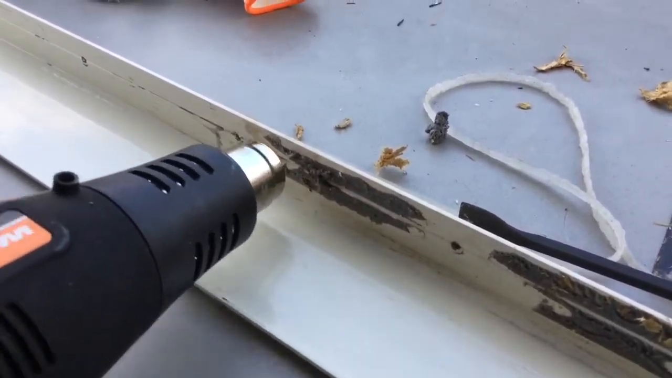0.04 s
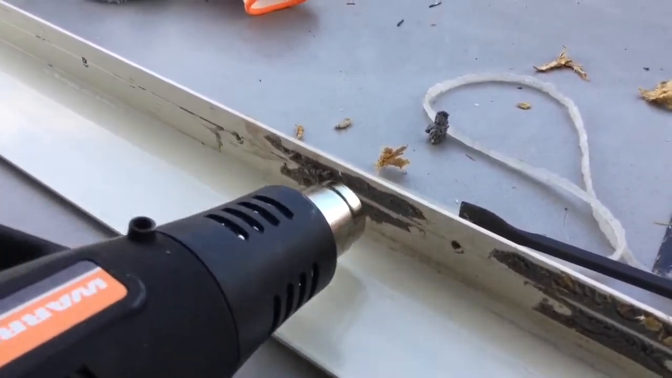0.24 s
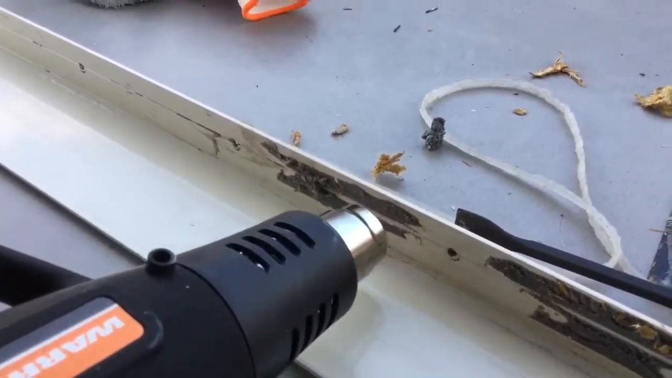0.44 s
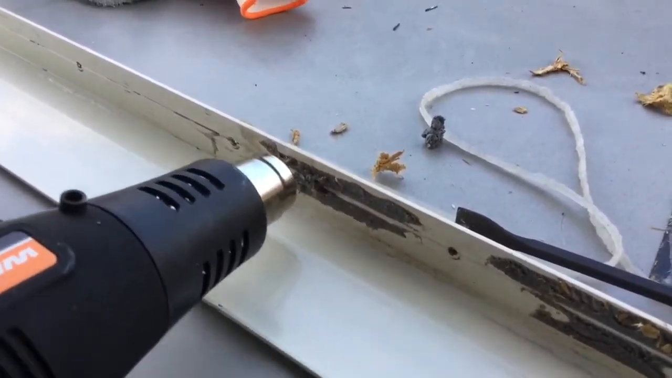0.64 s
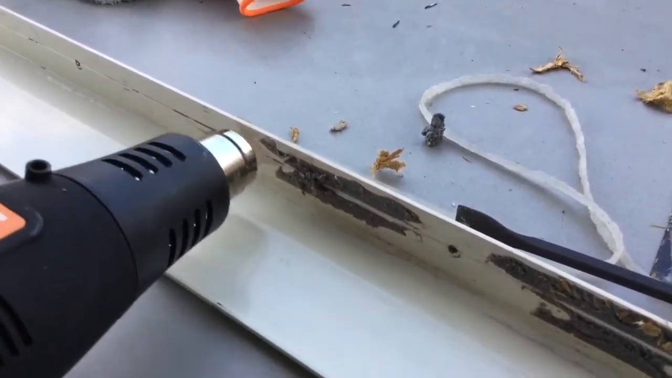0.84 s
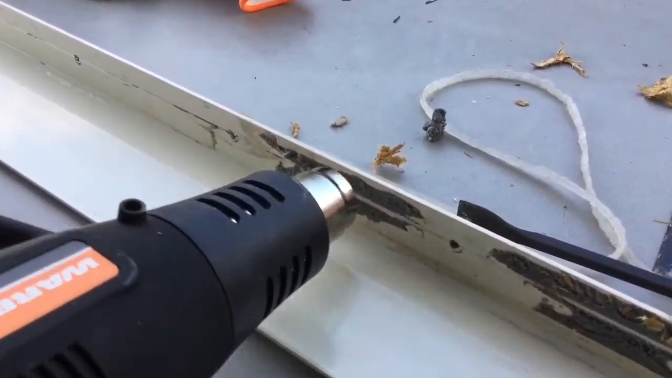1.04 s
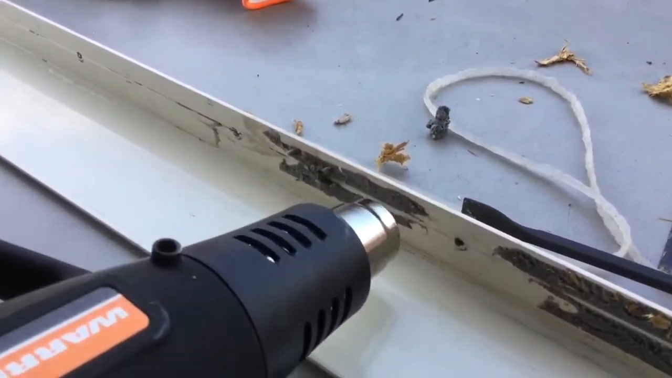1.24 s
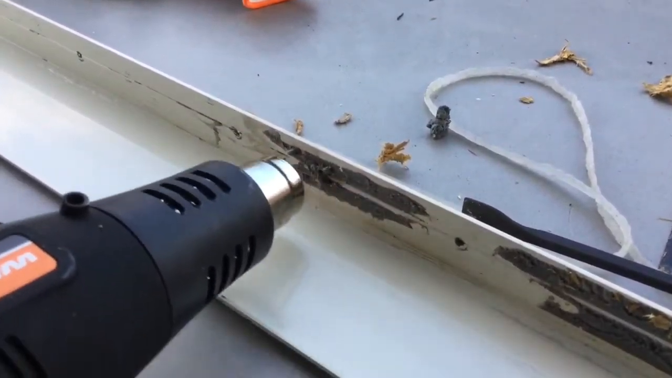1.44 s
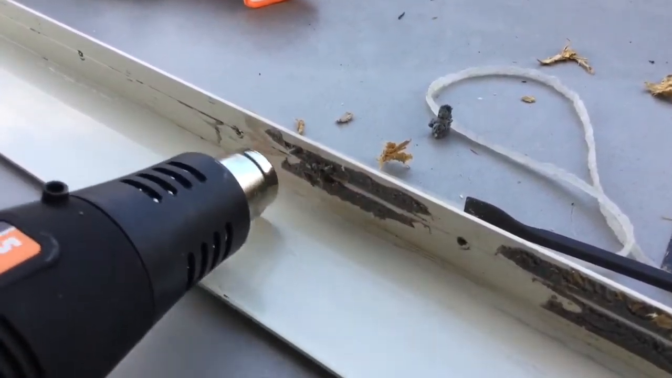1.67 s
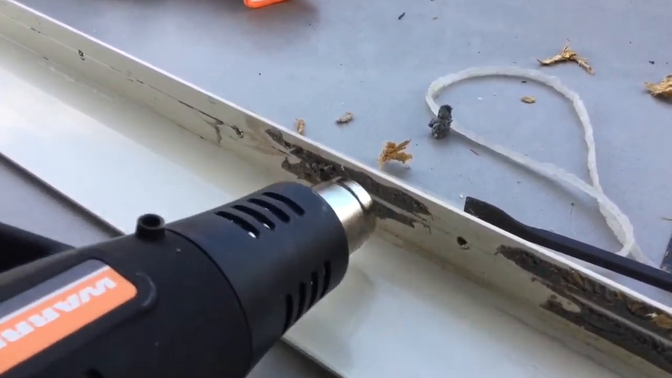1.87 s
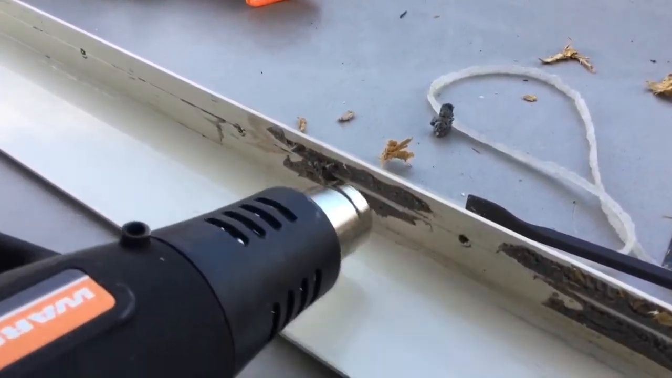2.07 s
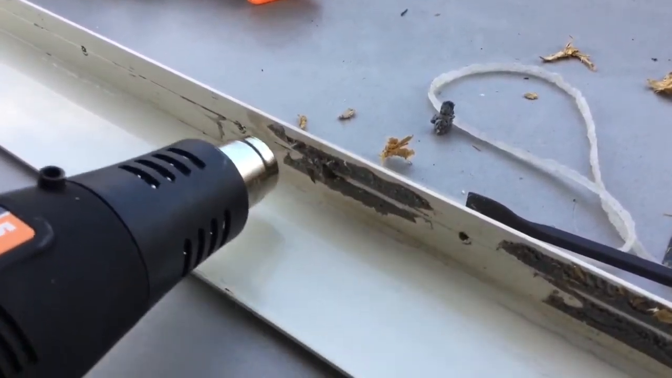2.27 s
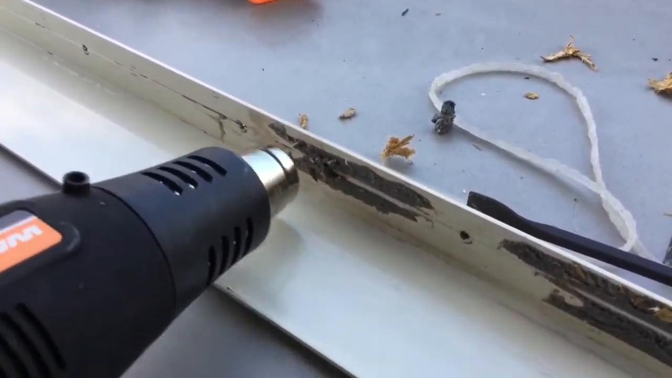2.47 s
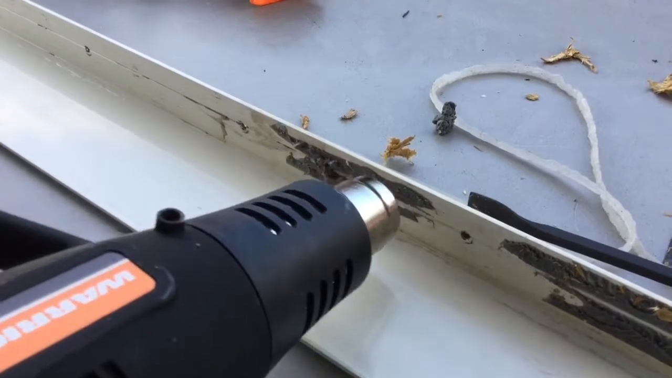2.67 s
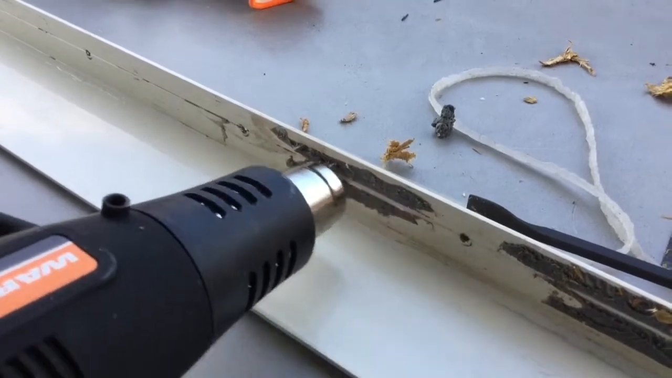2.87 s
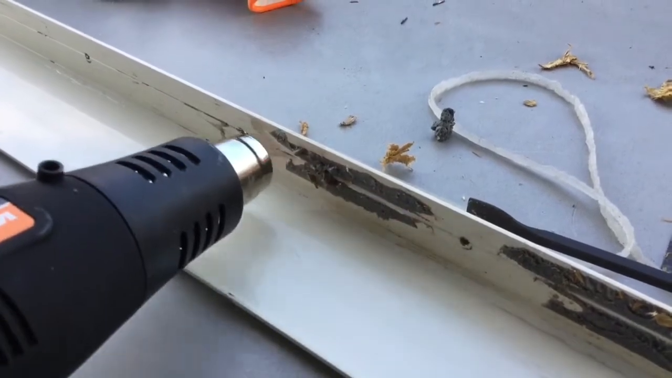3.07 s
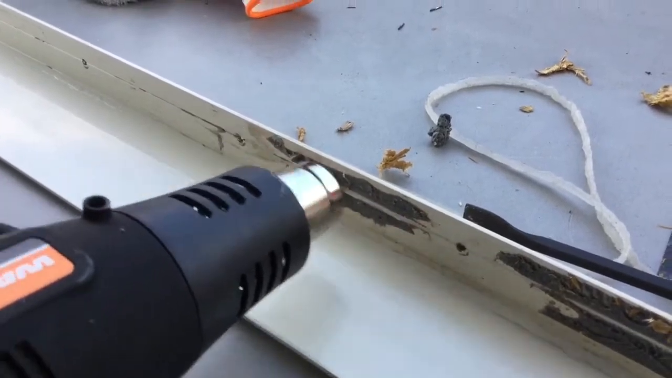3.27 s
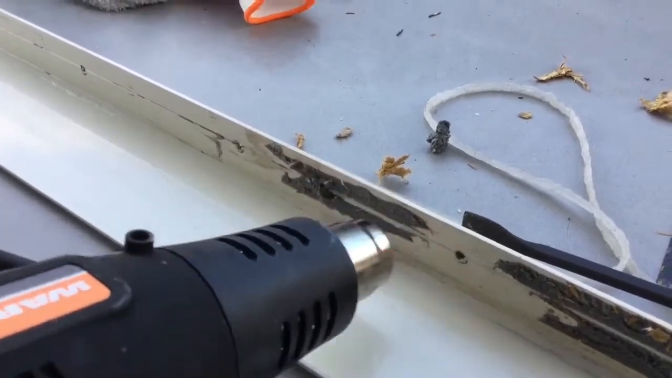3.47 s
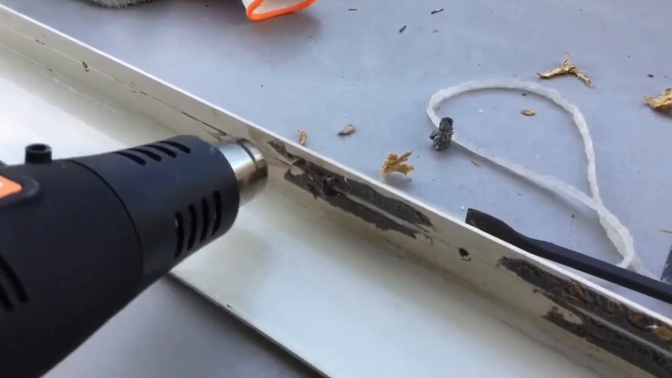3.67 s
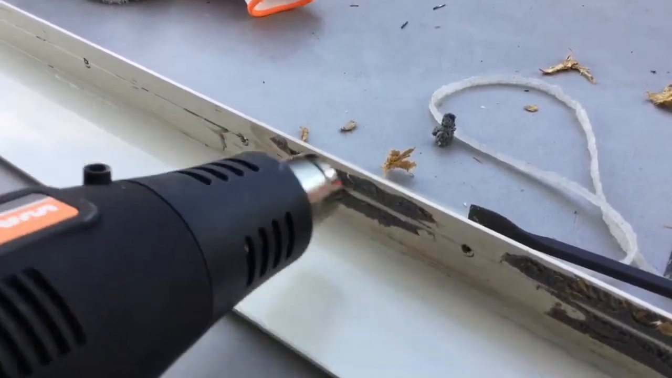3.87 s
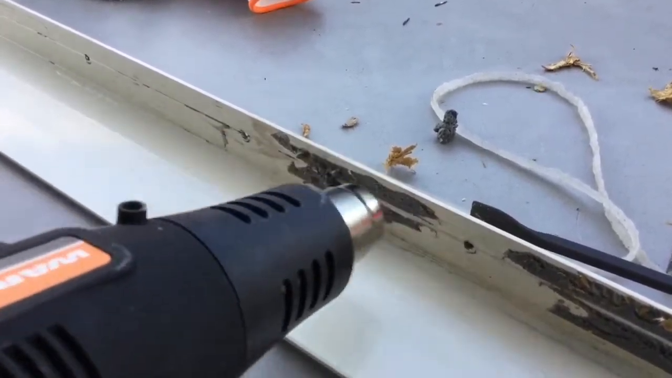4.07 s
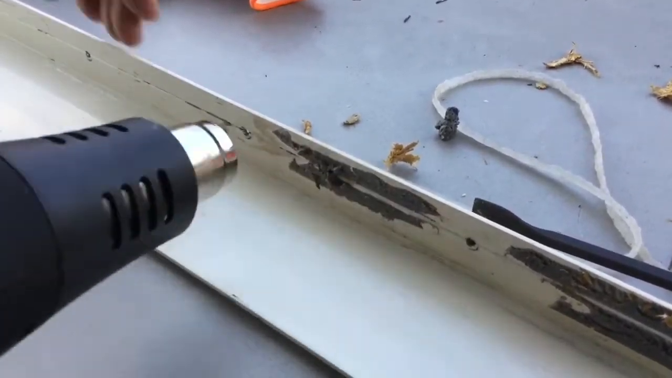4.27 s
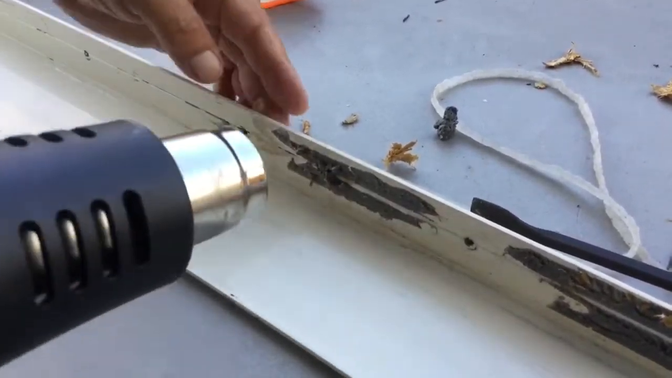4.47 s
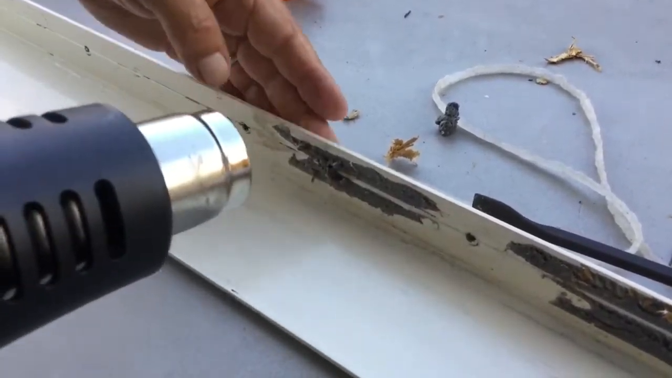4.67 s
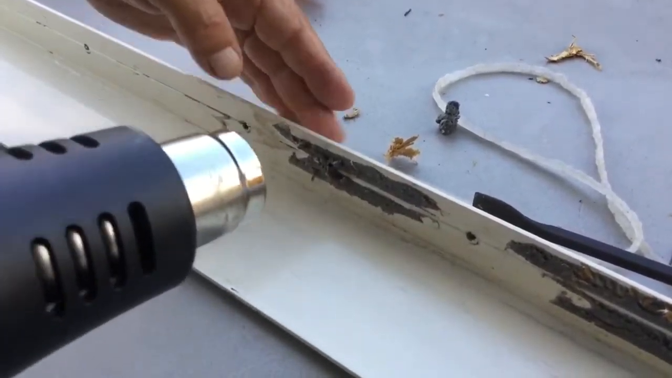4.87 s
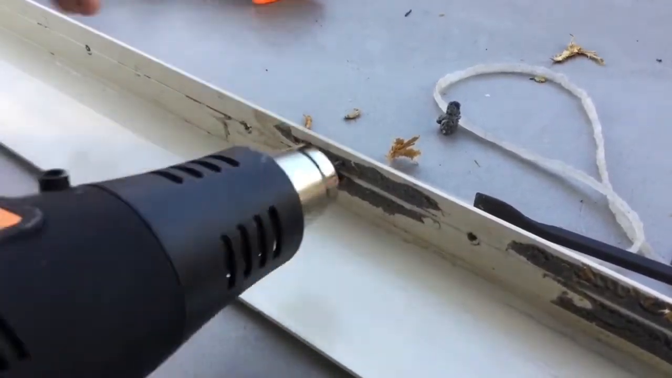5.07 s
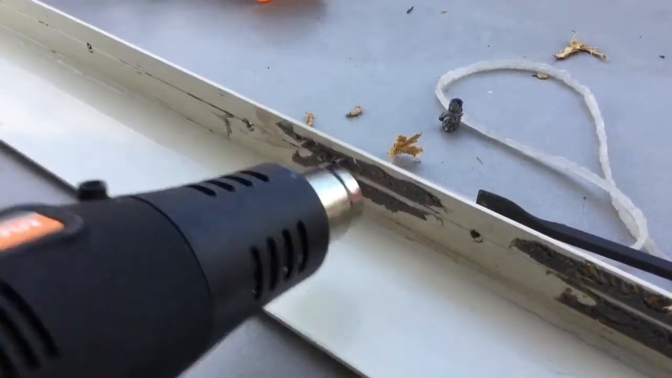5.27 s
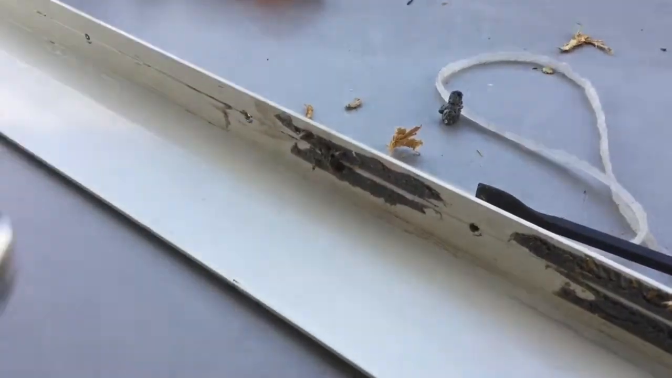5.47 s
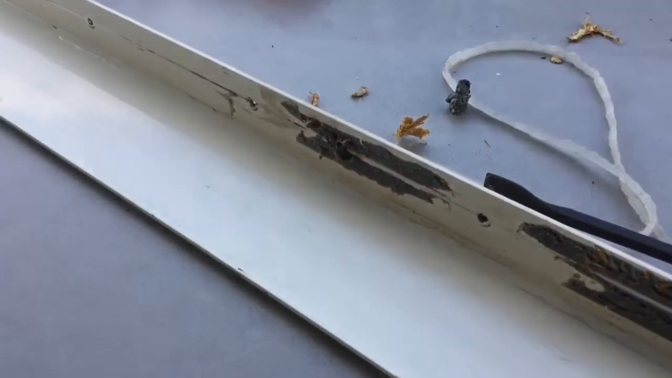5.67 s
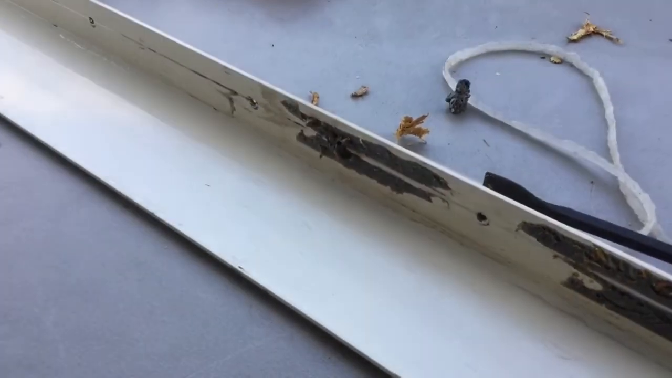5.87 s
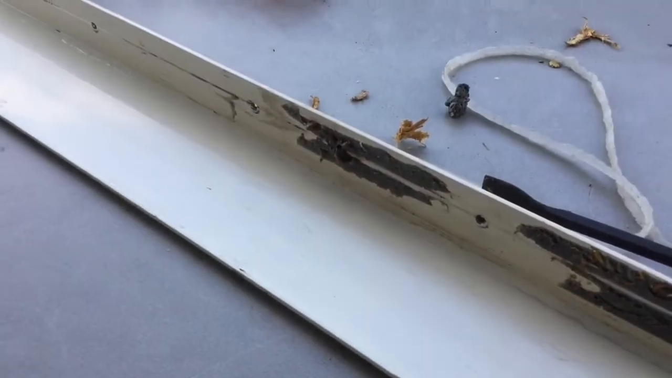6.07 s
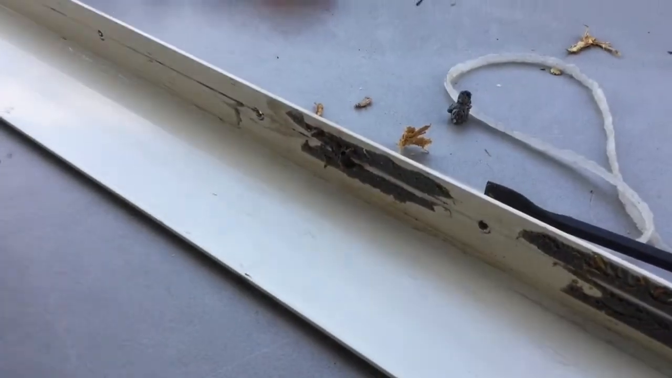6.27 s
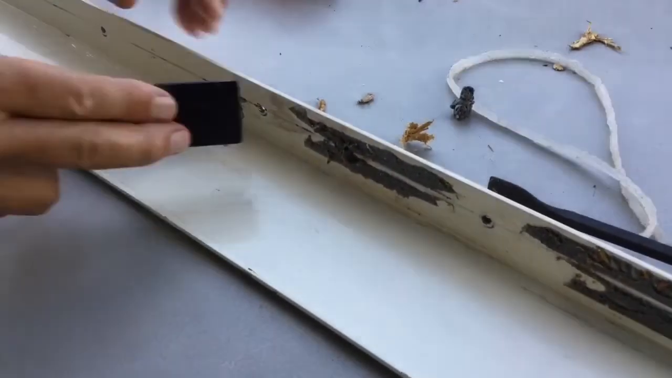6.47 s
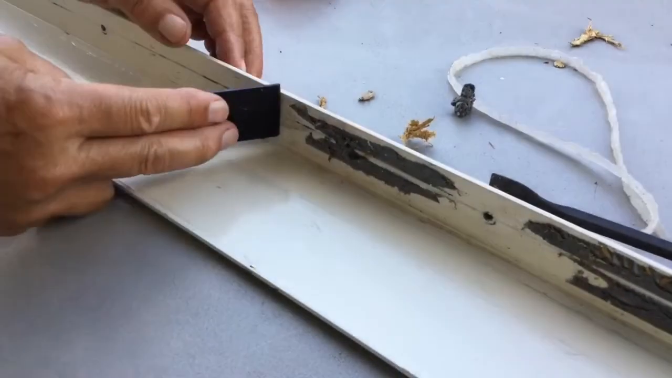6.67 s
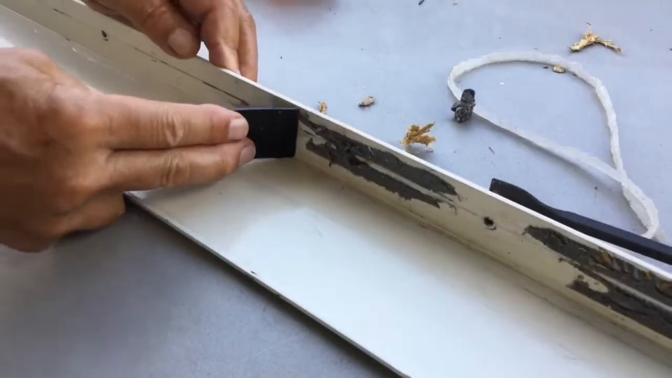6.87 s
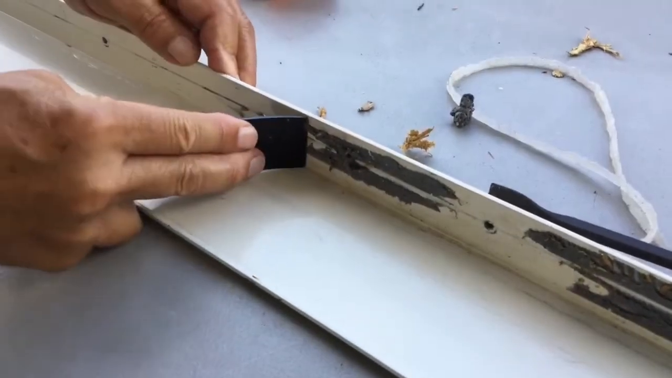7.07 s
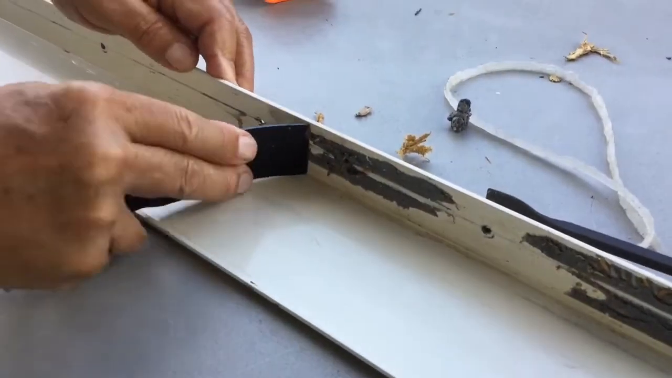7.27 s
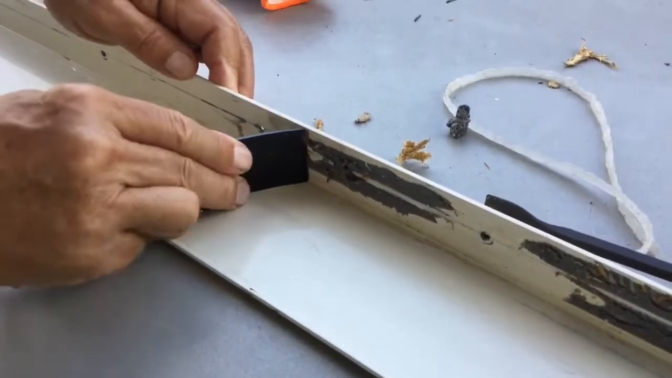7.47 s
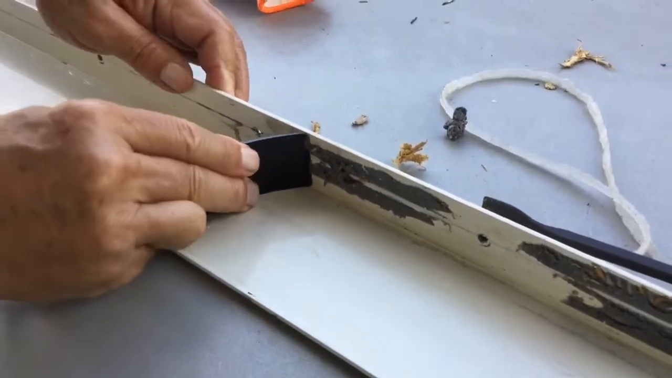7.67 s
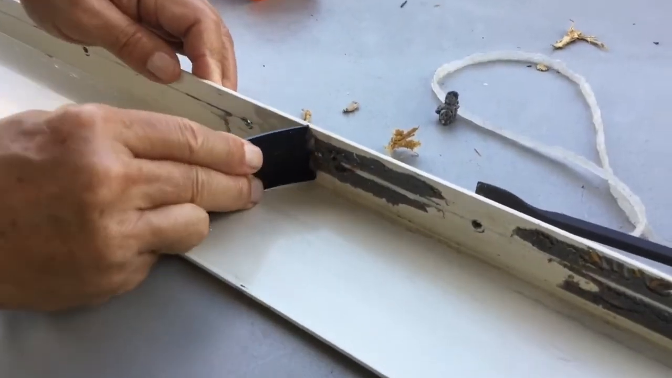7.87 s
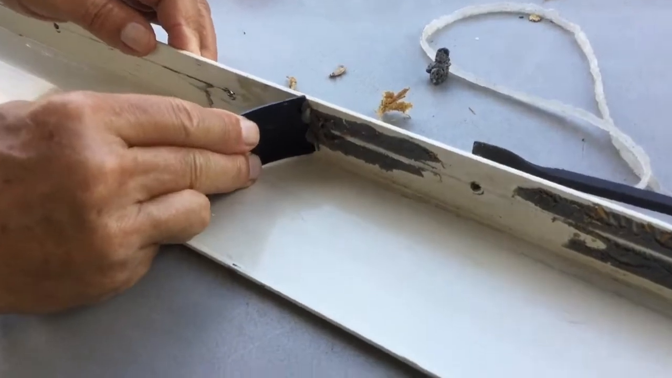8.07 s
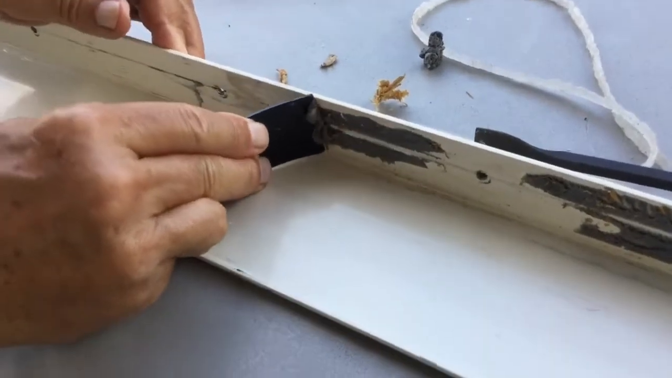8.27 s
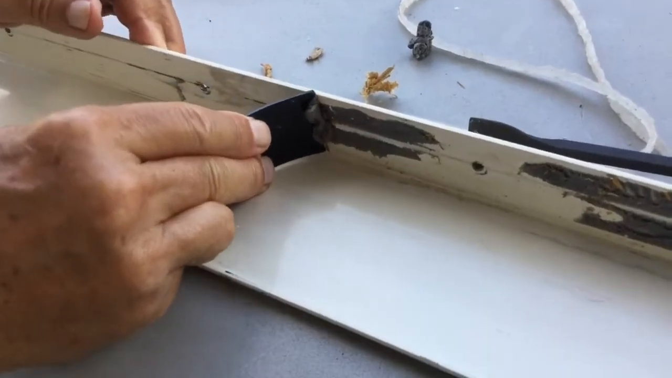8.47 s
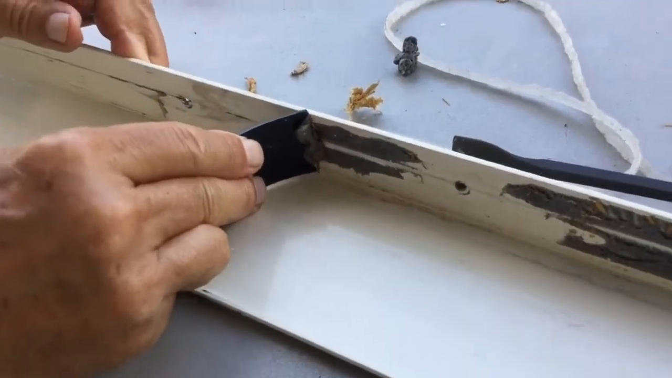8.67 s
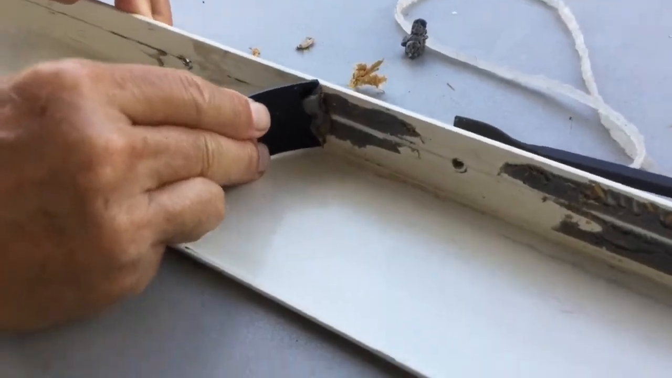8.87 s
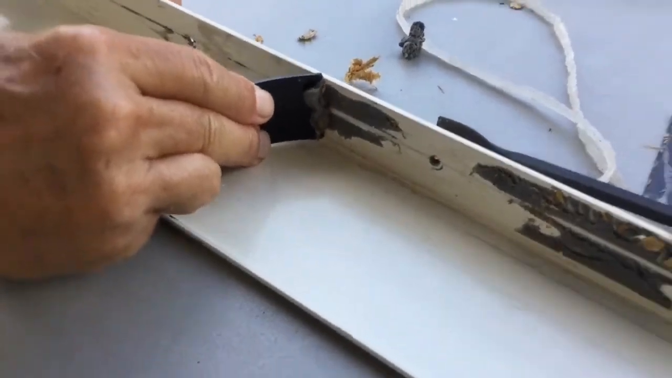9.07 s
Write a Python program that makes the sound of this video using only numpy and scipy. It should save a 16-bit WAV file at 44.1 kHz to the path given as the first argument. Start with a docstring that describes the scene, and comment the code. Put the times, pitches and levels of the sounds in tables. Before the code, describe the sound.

A heat gun blows and whines steadily up close, switches off and spins down, is set down with clattering knocks, then quiet rubbing and faint birds outdoors.

```python
"""An electric heat gun is waved over a painted metal frame on an outdoor table, close to a phone.
Air rushes from the nozzle as coloured noise; sines locked to the turning shaft make the fan's blade tone
and the motor's whine. It is switched off, coasts and is set down with knocks that ring table and frame.
Hands then settle on the frame and rub it with a small pad, as short bursts of noise.
Under it all lie a low outdoor hum and hiss, and later a few distant birds made of falling chirps."""
import sys
import numpy as np
from scipy import signal
from scipy.fft import rfft, irfft
from scipy.io import wavfile

SR = 44100
rng = np.random.default_rng(int(sys.argv[2]) if len(sys.argv) > 2 else 0)


def waveform_to_disk(signal):
    """Save audio, clipped to [-1, 1], as 16-bit WAV at the path in sys.argv[1]."""
    frames = np.transpose(np.atleast_2d(signal))
    scaled = np.clip(frames, -1, 1) * 32767
    samples = np.round(scaled).astype(np.int16)
    wavfile.write(sys.argv[1], SR, samples)


N = 403074
T = np.arange(N) / SR
FREQ = np.maximum(np.fft.rfftfreq(N, 1 / SR), 1)  # Hz, kept off zero for logarithms
OFF_S, COAST_S = 5.296, 0.32  # the switch opens; drag has halved the rotor's speed this much later
SWEEP_S, SWEEP_LOW_S = 0.777, 0.39  # period of the hand's sweep; time of a low point
LOUDEST_MULTIPLE = 51  # cycles of the loudest whine per turn of the shaft
SOUND_SPEED = 343  # m/s


def undb(db):
    """Decibels to gain."""
    return 10 ** (np.asarray(db) / 20)


def unit(x):
    """Scale to rms 1."""
    return x / np.sqrt(np.mean(x ** 2))


def curves(rows):
    """Each column of a timed table, sample by sample."""
    s, *columns = np.transpose(rows)
    return [np.interp(T, s, c) for c in columns]


def walk(rate):
    """Smooth random curve of spread near 1, drawn through `rate` random values a second."""
    count = int(N / SR * rate) + 3
    fine = signal.resample(rng.standard_normal(count), 8 * count)
    return np.interp(T * rate * 8, np.arange(len(fine)), fine)


def colour(points, rings=()):
    """Gain at each frequency: a broad spectrum with resonant humps."""
    hz, db = np.transpose(points)
    db = np.interp(np.log(FREQ), np.log(hz), db)
    for centre, width, lift in rings:
        db = db + lift / (1 + (2 * (FREQ - centre) / width) ** 2)
    return undb(db)


def noise(gain):
    """Noise of rms 1, coloured by the given gain at each frequency."""
    return unit(irfft(rfft(rng.standard_normal(N)) * gain, N))


def swell(s, rise, fade):
    """Contact force that builds up to time s and dies away."""
    return np.exp(np.where(T < s, (T - s) / rise, (s - T) / fade))


def posed(levels_db, sweep, turn, beam=2.5):
    """Gain of one part of the gun as it sweeps, comes nearer and faces away from the microphone."""
    aimed, swept, nearer, away = levels_db
    return undb(aimed + swept * sweep + nearer * turn + away * turn ** beam)


def facing(turn, aim, width=0.2):
    """Share of a beam that reaches the microphone as the gun turns through its aim."""
    return np.exp(-((turn - aim) / width) ** 2)


def rung(push, modes):
    """A pushed body rings with its decaying modes; the whole ring has unit energy."""
    t = T[:SR // 3]
    ring = np.zeros(len(t))
    for hz, t60, db in modes:
        decay = np.exp(-np.log(1000) * t / t60)
        ring += undb(db) * np.cos(2 * np.pi * hz * t) * decay
    return signal.fftconvolve(push, ring / np.linalg.norm(ring))[:N]


# Air in the barrel. Each row: frequency in Hz, relative level in dB per Hz.
AIR_SPECTRUM = [(25, -45.5), (60, -37), (120, -27.5), (160, -15.5), (260, -19.5), (380, -17), (520, -14),
                (760, -4), (1300, -10), (2300, -15), (3100, -14.5), (3400, -17.5), (3800, -13), (4400, -14),
                (5100, -24.5), (8800, -23), (10400, -27.5), (13300, -23), (15700, -28)]
# Cavities of the barrel. Each row: frequency in Hz, width in Hz, lift in dB.
BARREL_CAVITIES = [(1019, 250, 8.5), (1722, 550, 6.5), (2890, 100, 4), (3700, 130, 3.5), (6050, 140, 6.5)]
# Hiss of the half-turned gun, partly shaded by its nozzle. Each row: frequency in Hz, width in Hz, lift in dB.
NOZZLE_SHADE = [(3400, 540, 1.5), (4250, 653, -4.5), (5530, 380, 6.5)]
# Low roar and high hiss at full speed. One row each: level aimed at the frame in dB, change at the low
# point of a sweep in dB, change when lifted nearer in dB, change when facing away in dB.
ROAR_LEVELS = (-32.5, 1, -1.0, 0.1)
HISS_LEVELS = (-37, -0.24, 5.5, -6)


def airflow(angle, speed, sweep, turn, split_hz=1900, roar_power=2.95, hiss_power=3.5, chop=0.17,
            gust_db=3.5, echo=0.17, dull_hz=6000, near_ms=0.059, lifted_ms=0.49, lift_power=2.1,
            vent_db=-42, flutter_db=2):
    """Turbulence rings the barrel, the rotor chops its hiss, and the echo off the frame combs it."""
    low_share = 1 / (1 + (FREQ / split_hz) ** 6)
    low, high = np.sqrt(low_share), np.sqrt(1 - low_share)
    barrel = colour(AIR_SPECTRUM, BARREL_CAVITIES)
    roar = noise(barrel * low) * undb(0.32 * walk(160) + 0.42 * walk(10))
    shaded = facing(turn, 0.35, width=0.13)
    shaded_barrel = colour(AIR_SPECTRUM, BARREL_CAVITIES + NOZZLE_SHADE)
    hiss = np.sqrt(1 - shaded) * noise(barrel * high) + np.sqrt(shaded) * noise(shaded_barrel * high)
    hiss = hiss * undb(0.484 * walk(200) + 0.84 * walk(12))
    # both die with a power of the rotor's speed
    roar = roar * posed(ROAR_LEVELS, sweep, turn) * speed ** roar_power
    hiss = hiss * posed(HISS_LEVELS, sweep, turn) * speed ** hiss_power
    # the flow breaks into gusts as the rotor slows
    gusts = undb(gust_db * (1 - speed) * walk(70))
    air = (roar + hiss * (1 + chop * np.cos(2 * angle))) * gusts
    # the narrow frame scatters the highest hiss instead of mirroring it
    mirrored = irfft(rfft(air) / (1 + (FREQ / dull_hz) ** 6), N)
    lag_ms = near_ms + (lifted_ms - near_ms) * turn ** lift_power
    reflected = np.interp(T - lag_ms / 1000, T, mirrored)
    # turned aside, the vent slots face the microphone
    slots = colour([(60, -18.5), (400, -28.0), (3000, -27.5), (7000, -25.0), (15000, -33)],
                   [(1930, 830, 23), (5580, 1400, 16.0)])
    vents = turn ** 3 * noise(slots) * undb(vent_db + flutter_db * walk(30)) * speed ** roar_power
    return (air + echo * reflected + vents) * np.interp(T, [5.62, 5.72], [1, 0])


# Blade tone at full speed. One row: peak level aimed at the frame in dB, change at the low point of a
# sweep in dB, change when lifted nearer in dB, change when facing away in dB.
BLADE_LEVELS = (-36.5, 0.9, 6.5, -18.5)


def fan(angle, speed, sweep, turn, flutter_db=0.5, waver_db=1.1):
    """Six blades pass the stator vanes in uneven inflow."""
    tone = np.sin(6 * angle + .15 * walk(60))  # phase jitter in radians
    unsteady = undb(flutter_db * walk(40) + waver_db * walk(11.0))
    return tone * posed(BLADE_LEVELS, sweep, turn) * unsteady * speed ** 8


# Motor whine. Each row: multiple of the shaft rate, peak level aimed at the frame in dB, peak level
# turned aside in dB, all before whine_db and the table echo.
WHINE_LINES = [(1, -58, -68), (2, -51, -56), (3, -53, -50), (5, -60, -52), (7, -50, -52), (8, -52, -54),
               (9, -57, -52), (10, -55, -44), (11, -61, -55), (12, -49, -52), (15, -57, -62),
               (30, -59, -48), (33, -59, -58), (34, -60, -51), (35, -59, -61), (36, -60, -56),
               (40, -55, -62), (41, -58, -54), (44, -53, -57), (45, -48, -53), (49, -55, -47),
               (50, -60, -46), (52, -53, -53), (53, -62, -52), (54, -54, -59), (55, -61, -53),
               (56, -47, -57), (57, -57, -61), (59, -61, -56)]
# Loudest line of the whine. Each row: time in seconds, rms level in dB.
LOUDEST_LEVEL = [(0, -47), (.14, -38.5), (.4, -52), (.55, -42), (.8, -52), (.95, -40), (1.12, -52),
                 (1.34, -42), (1.55, -54.5), (1.8, -38), (2, -61), (2.13, -37.5), (2.33, -61),
                 (2.48, -38.5), (2.7, -58.5), (2.9, -41), (3.05, -41), (3.25, -42), (3.4, -45), (3.58, -37),
                 (3.7, -61), (3.85, -47), (4.1, -44.5), (4.3, -59), (4.5, -41.5), (5.1, -56), (5.22, -45)]
# Tones beamed through the vent slots. Each row: multiple of the shaft rate, mean peak level in dB when
# pointed at the microphone, turn that points it there from 0 to 1.
VENT_BEAMS = [(8, -49, .47), (9, -53, .36), (10, -50.5, .5), (20, -53, .5), (21, -51, .38), (28, -59, .3),
              (29, -56, .35), (40, -58, .42), (41, -57, .5)]


def motor(angle, shaft_hz, sweep, turn, detour_m=0.178, swing_m=0.012, tremor_m=0.007, drift_m=0.0072,
          table_echo=0.6, lifted_loss=0.42, weak_db=-64, whine_db=2.5, waver_db=3, cut_s=0.004):
    """Commutator whine on the shaft's multiples; a table echo fades most lines, the loudest swells on its own."""
    # extra path of the echo off the table
    path_m = detour_m + swing_m * sweep + drift_m * turn * walk(2.2) + tremor_m * walk(13)
    echo_angle = (2 * np.pi * shaft_hz * path_m / SOUND_SPEED).astype(np.float32)
    beamed = np.zeros(N)
    for k, db, aim in VENT_BEAMS:
        beamed += np.sin(round(k) * angle) * undb(db + waver_db * walk(8)) * facing(turn, aim)
    s, level_db = np.transpose(LOUDEST_LEVEL)
    loudest = np.sqrt(2) * np.sin(LOUDEST_MULTIPLE * angle) * np.interp(T, s, undb(level_db))

    lines = {round(k): (ahead, aside) for k, ahead, aside in WHINE_LINES}
    angle = (angle % (2 * np.pi)).astype(np.float32)
    turn, whine = turn.astype(np.float32), np.zeros(N)
    # lifted off the table, these echoed lines hold steadier
    echo = table_echo * (1 - lifted_loss * turn ** 2)
    for k, start in enumerate(rng.uniform(0, 2 * np.pi, size=60).tolist(), 1):
        ahead, aside = lines.get(k, (weak_db, weak_db))
        phase = k * angle + start
        # of these, the high lines are beamed at the table and fade the most
        reflected = echo * (k / LOUDEST_MULTIPLE) ** .5 * np.sin(phase - k * echo_angle)
        whine += undb(ahead + (aside - ahead) * turn) * (np.sin(phase) + reflected)
    # the whine stops with the current
    current = np.exp(-np.maximum(T - OFF_S, 0) / cut_s)
    return (whine * undb(whine_db) + beamed + loudest) * current


# Rings of the motor can and brush springs. Each row: frequency in Hz, width in Hz, lift in dB.
CAN_RINGS = [(4700, 700, 5.5), (5700, 270, 3), (7940, 700, 8.5), (11640, 600, 12), (13300, 650, 15.5),
             (14050, 300, 7), (15000, 800, 8)]


def brushes(angle, running_db=-57, coasting_db=-41, chop=0.39):
    """Brushes scrape the commutator and ring the can, most as it coasts, until the gun is taken away."""
    scrape = noise(colour([(3000, -16.5), (10000, -21.0), (13000, -15.0), (16000, -21.0)], CAN_RINGS))
    level_db = np.interp(T, [OFF_S - .02, OFF_S + 0.032], [running_db, coasting_db])
    away_db = np.interp(T, [5.43, 5.49, 5.62, 6.0], [-1.0, -10, -34, -68])
    return scrape * (1 + chop * np.cos(2 * angle)) * undb(level_db + away_db)


def warble(speed, turn, centre_hz=1850, width_hz=190, wander_hz=95, level_db=-39, flutter_db=1.2):
    """Air across the vent slots' edges whistles unsteadily, heard when they face the microphone."""
    airy = noise(1 / (1 + (2 * FREQ / width_hz) ** 2))
    pitch = centre_hz * speed + wander_hz * walk(70)
    whistle = np.sqrt(2) * airy * np.sin(2 * np.pi * np.cumsum(pitch) / SR)
    return whistle * turn ** 3 * speed ** 3 * undb(level_db + flutter_db * walk(40))


def last_turns(ring_hz=2560, width_hz=300, level_db=-57.5, loudest_s=5.55, rise_s=.25, fade_s=0.39,
               stop_s=6.02):
    """The slow rotor rubs a narrow ring out of the housing until it stops."""
    ring = noise(1 / (1 + (2 * (FREQ - ring_hz) / width_hz) ** 4))
    stopping = np.clip((stop_s - T) / .1, 0, 1)
    return ring * undb(level_db) * swell(loudest_s, rise_s, fade_s) * stopping


# How far the gun is lifted and turned aside. Each row: time in seconds, share from 0 to 1.
GUN_TURN = [(0, 0.17), (3.3, 0.22), (3.85, 0.42), (4.33, 0.51), (4.42, 0.98), (4.92, 0.92), (4.98, 0.56),
            (5.3, 0.27)]
# Loudest whine line at full speed, locked to the shaft. Each row: time in seconds, pitch in Hz before waver.
LOUDEST_PITCH = [(0.0, 13309), (3.55, 13308), (3.78, 13355), (5.01, 13287), (5.26, 13314)]


def heat_gun():
    """One shaft drives air, fan tone and whine; the hand sweeps and lifts the gun; switched off, it coasts."""
    shaft_hz = curves(LOUDEST_PITCH)[0] / LOUDEST_MULTIPLE
    turn = curves(GUN_TURN)[0]
    # 1 at the low point of a sweep, smaller as the gun is turned aside
    sweep = np.cos(2 * np.pi * (T - SWEEP_LOW_S) / SWEEP_S) * (1 - turn)
    speed = 1 / (1 + np.maximum(T - OFF_S, 0) / COAST_S)
    waver = 1 + .0003 * walk(12) + .0005 * walk(120)
    angle = 2 * np.pi * np.cumsum(shaft_hz * speed * waver) / SR
    blower = airflow(angle, speed, sweep, turn) + fan(angle, speed, sweep, turn) + warble(speed, turn)
    return blower + motor(angle, shaft_hz, sweep, turn) + brushes(angle) + last_turns()


# Outdoor background. Each row: frequency in Hz, relative level in dB per Hz.
YARD_SPECTRUM = [(25, -32), (55, -8.5), (125, 1), (220, -2.5), (330, -16.5), (480, -22), (800, -28),
                 (1100, -28), (1600, -33), (2600, -38.5), (3600, -35), (6200, -32.5), (7500, -43),
                 (15500, -44)]
# Drone of far machinery. Each row: frequency in Hz, width in Hz, lift in dB.
FAR_MACHINERY = [(161, 9, 13.5), (818, 124, 12), (2120, 68, 9.5)]


def yard(drone_db=-55, split_hz=400):
    """A steady low drone lies under a smooth distant hiss."""
    gain = colour(YARD_SPECTRUM, FAR_MACHINERY)
    low_share = 1 / (1 + (FREQ / split_hz) ** 4)
    low, high = gain * np.sqrt(low_share), gain * np.sqrt(1 - low_share)
    hiss_share = np.linalg.norm(high) / np.linalg.norm(low)
    hiss = noise(high) * hiss_share * undb(0.35 * walk(3.85))
    return undb(drone_db) * (noise(low) + hiss)


# Knocks of the gun and the hands on the table. Each row: time in seconds, relative force in dB, contact
# hardness in Hz, length in seconds, relative ring of the metal frame in dB, place on the frame from 0
# (upright) to 1 (sill).
KNOCK_CONTACTS = [(5.581, -46.5, 362, 0.031, -23, .5), (5.68, -37, 670, .006, -11, .4),
                  (5.696, -27, 420, 0.018, -7, .5), (5.712, -41, 300, 0.011, -13, .5),
                  (5.768, -26, 510, 0.0088, -16, .6), (5.798, -32.5, 340, 0.011, -15, .5),
                  (5.817, -41, 260, .012, -22, .5), (5.841, -40, 198, 0.021, -14, .5),
                  (5.943, -41, 507, 0.013, -11, .3), (5.971, -37.5, 165, .014, -21, .5),
                  (6.04, -48.5, 175, .018, -22, .5), (6.095, -50, 287, .022, -27, .5),
                  (6.556, -50.5, 380, 0.0084, 0, 0), (6.571, -62, 330, .007, -1, 0),
                  (6.597, -56.5, 293, .013, -4, 0.41), (6.696, -71, 302, .028, 0, .8),
                  (6.81, -71, 300, .016, 2, .9), (7.226, -70, 436, .022, -12, .3),
                  (7.372, -61, 400, .032, -17, .2), (7.469, -55, 380, .012, -6, 0.97),
                  (7.484, -58, 170, .007, -18, 1), (7.54, -66, 298, .01, -6, .9)]
# Modes of the table top. Each row: frequency in Hz, t60 in seconds, relative level in dB.
TABLE_MODES = [(103.4, 0.25, 1.5), (125.7, 0.22, 3), (207.5, 0.19, 1.5), (250, 0.063, -3), (289.5, .11, 9),
               (323, 0.1, 1), (354, .11, 4), (400, .08, -4)]
# Modes of the plastic housing. Each row: frequency in Hz, t60 in seconds, relative level in dB.
HOUSING_MODES = [(770, 0.097, -5), (924, 0.072, -9), (1157, .1, -6), (1244, 0.074, -2), (1338, 0.068, 0.5),
                 (1380, 0.057, 3), (1453, 0.079, -2), (1725, 0.064, -1), (2380, 0.055, -7)]
# Modes of the metal frame. Each row: frequency in Hz, t60 in seconds, relative level struck on the
# upright in dB, relative level struck on the sill in dB.
FRAME_MODES = [(834, .06, 5, -12), (1060, .06, 3, -17), (1420, 0.065, -5, 0), (1617, 0.075, -7, 7),
               (1880, .07, 0, -12), (2120, 0.096, -9, 1), (2345, 0.064, 2, -18), (2730, .06, -3, -7),
               (3260, .06, -24, -6), (3540, .06, -18, -24), (4410, .06, -14, -18), (5850, .06, -18, -14),
               (6550, .05, -13, -24)]
# Plastic housing on the frame, then hard ticks. Each row: frequency in Hz, relative level in dB per Hz.
CLATTER_SPECTRUM = [(50, -39), (150, -2), (310, 9), (410, -8), (520, -1), (900, -3.5), (1100, -3.5),
                    (1360, 2.5), (1700, -6), (2000, -4.5), (2600, -7.5), (3200, -21), (6000, -37.5),
                    (15000, -53)]
TICK_SPECTRUM = [(500, -30), (2200, 5.5), (3300, -3), (4600, -0.5), (6500, -9), (8000, -10.5), (13000, -13),
                 (15700, -20)]


def knocks(grain_db=1.5, blow=.35, table_db=4.5, housing_db=-5, firm_hz=388, rise_share=0.89):
    """Blows amid scuffing contacts ring table top, housing and frame, and rattle the loose plastic."""
    thud, shell, upright, sill, clatter, tick = np.zeros((6, N))
    contacts, plastic = rng.standard_normal(N), noise(colour(CLATTER_SPECTRUM))
    half = SR // 4
    for s, db, hardness_hz, length, frame_db, place in KNOCK_CONTACTS:
        near = slice(int(s * SR) - half, int(s * SR) + half)
        force = undb(db) * swell(s, rise_share * length, length)[near]
        harder = np.log2(hardness_hz / firm_hz)  # octaves above an ordinary contact
        push = contacts[near] * force + 1e-18
        # the blow lands just before the rattle peaks
        push[half - int(.004 * SR)] += blow * undb(db) * np.sqrt(length * SR)
        # a soft contact reaches only the lowest modes and dulls the rattle
        soft = signal.butter(2, [55, max(hardness_hz, 90)], "band", fs=SR, output="sos")
        dull = signal.butter(6, min(1100 + 2.8 * hardness_hz, 8000), fs=SR, output="sos")
        # softer contacts thud more, harder ones tick more
        thud[near] += undb(1.2 - 9.5 * harder) * signal.sosfilt(soft, push)
        tick[near] += undb(-11.5 + 12.5 * harder) * force
        shell[near] += signal.sosfilt(dull, push)
        upright[near] += undb(frame_db) * (1 - place) * push
        sill[near] += undb(frame_db) * place * push
        clatter[near] += force * signal.sosfilt(dull, plastic[near])
    hz, t60, upright_db, sill_db = np.transpose(FRAME_MODES)
    frame = rung(upright, zip(hz, t60, upright_db)) + rung(sill, zip(hz, t60, sill_db))
    table = undb(table_db) * rung(thud, TABLE_MODES)
    housing = undb(housing_db) * rung(shell, HOUSING_MODES)
    rattle = (clatter + tick * noise(colour(TICK_SPECTRUM))) * undb(grain_db * walk(540))
    return table + housing + frame + rattle


# Brief rubs of hand and pad. Each row: time in seconds, peak level in dB before grain, rise in seconds,
# fade in seconds, tilt in dB per octave, ring in Hz, top in Hz.
RUB_STROKES = [(6.03, -65, 0.016, .012, 5, 3400, 15700), (6.2, -71, .05, 0.054, 6, 14200, 15700),
               (6.18, -65, .015, 0.03, 0, 3400, 6500), (6.333, -48, 0.02, .012, 6.5, 3450, 15700),
               (6.47, -63, 0.13, 0.071, -2, 4650, 6300), (7.37, -69, .033, .032, 1, 4000, 15000),
               (7.405, -55.5, .013, .011, -2, 5800, 15000), (8.747, -58.5, .01, 0.0074, -1, 6350, 15000)]
# Rubbing friction. Each row: frequency in Hz, relative level in dB per Hz.
RUB_SPECTRUM = [(300, 3), (1500, -4.5), (2700, -11), (3150, 0), (3900, -4), (4600, -4.5), (5300, -3),
                (5900, -5), (6350, -7), (6900, -6), (7900, -8), (9000, -5), (11000, -13.5), (12400, -4),
                (13600, -6), (15700, -8)]


def rubs(grain_db=2, ring_width_hz=450, ring_db=9.5):
    """Dry, grainy friction of skin and pad; each stroke has its own tilt and rings what it touches."""
    octaves = np.maximum(np.log2(FREQ / np.mean(FREQ)), -2)
    strokes = np.zeros(N)
    for s, db, rise, fade, tilt_db, ring_hz, top_hz in RUB_STROKES:
        gain = colour(RUB_SPECTRUM, [(ring_hz, ring_width_hz, ring_db)]) * undb(tilt_db * octaves)
        gain = gain / np.sqrt(1 + (FREQ / top_hz) ** 16)
        strokes += undb(db) * swell(s, rise, fade) * noise(gain)
    return strokes * undb(grain_db * walk(400))


# Distant birds. Each row: mid time in seconds, middle pitch in Hz before rasp, relative level in dB.
BIRD_CHIRPS = [(7.228, 4230, -74), (7.30, 4500, -76), (7.82, 8300, -84), (8.39, 4300, -76),
               (8.468, 4350, -73), (8.926, 4280, -74), (9.016, 4420, -71)]


def birds(chirp_s=0.046, drop_hz=2000, drop_s=.005, rasp_hz=330, echo_s=.02, lift_db=4.0):
    """Short raspy chirps that drop from a high note to a low one, blurred by distance."""
    chirps, rasp = np.zeros(N), rasp_hz * walk(500)
    for s, hz, db in BIRD_CHIRPS:
        near = np.abs(T - s) < chirp_s / 2
        t = T[near] - s
        pitch = hz - drop_hz / 2 * np.tanh(t / drop_s) + rasp[near]
        shape = np.sqrt(np.abs(np.cos(np.pi * t / chirp_s)))
        chirps[near] += undb(db + lift_db) * shape * np.sin(2 * np.pi * np.cumsum(pitch) / SR)
    scatter = rng.standard_normal(SR // 4) * np.exp(-T[:SR // 4] / echo_s)
    blurred = signal.fftconvolve(chirps, scatter / np.linalg.norm(scatter))[:N]
    return 0.92 * chirps + 0.54 * blurred


def scene():
    """One microphone feeds both channels."""
    mono = heat_gun() + yard() + knocks() + rubs() + birds()
    return np.array([mono, mono])


def record(dry, top_hz=15700):
    """The phone cuts the top with a steep low-pass."""
    return signal.sosfilt(signal.ellip(10, .2, 80, top_hz, fs=SR, output="sos"), dry)


dry = scene()
out = record(dry)
waveform_to_disk(out)
```